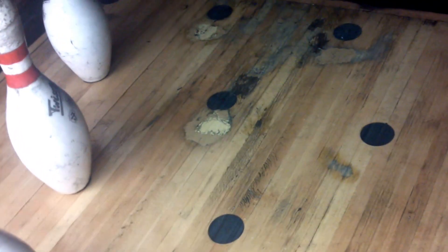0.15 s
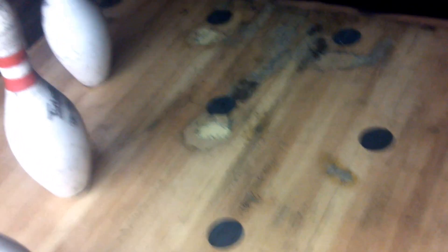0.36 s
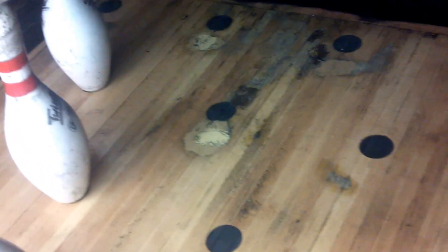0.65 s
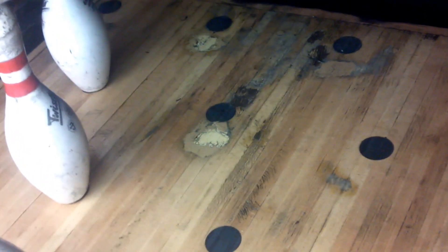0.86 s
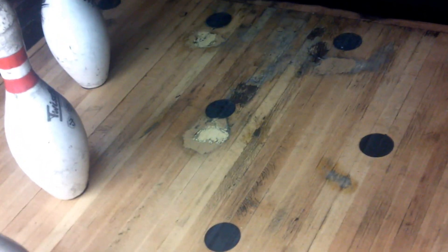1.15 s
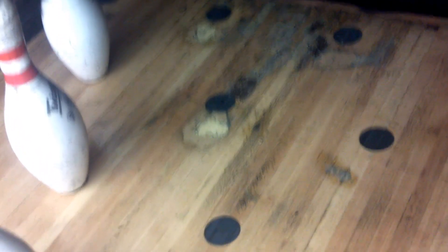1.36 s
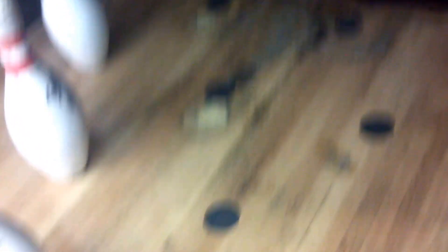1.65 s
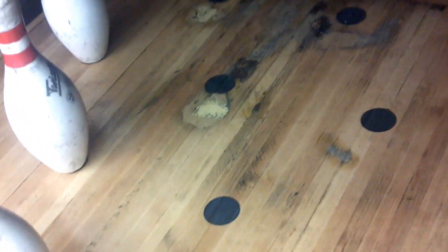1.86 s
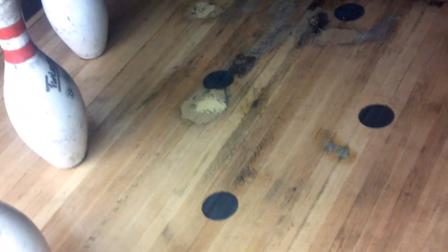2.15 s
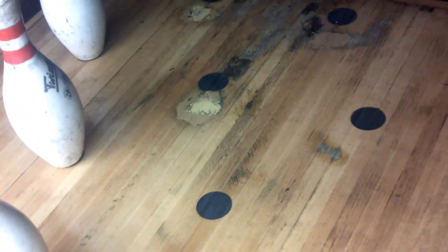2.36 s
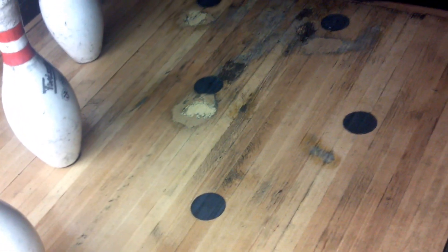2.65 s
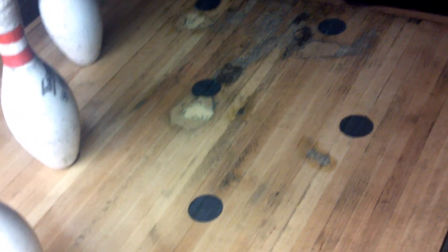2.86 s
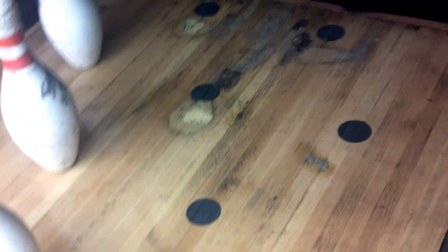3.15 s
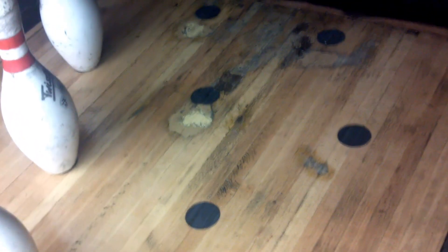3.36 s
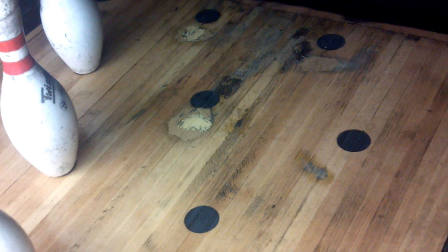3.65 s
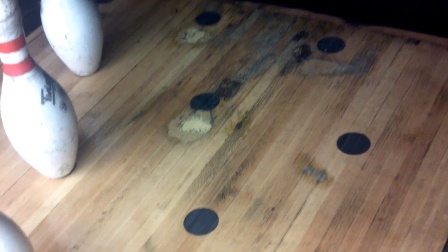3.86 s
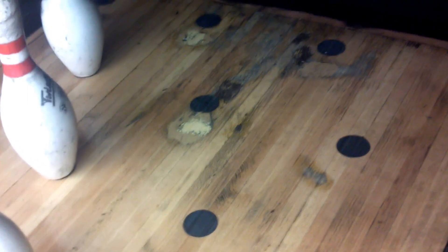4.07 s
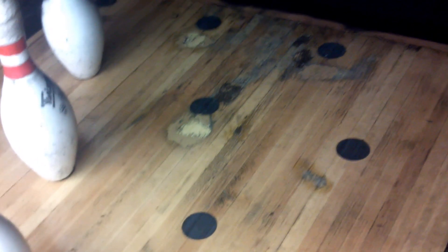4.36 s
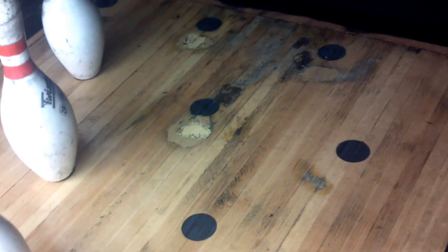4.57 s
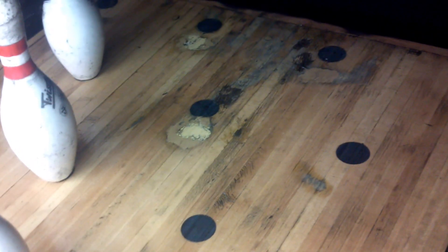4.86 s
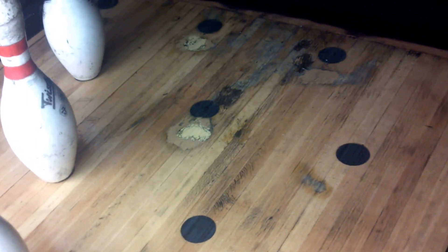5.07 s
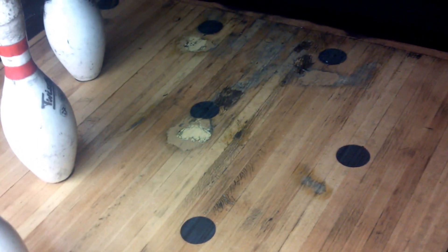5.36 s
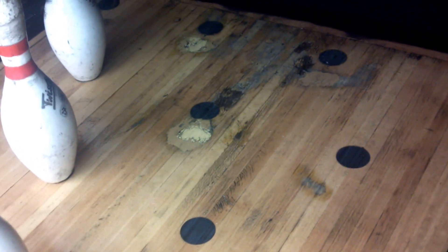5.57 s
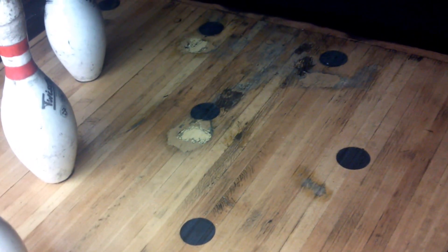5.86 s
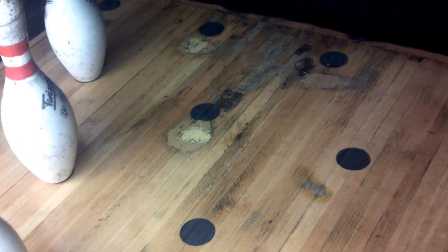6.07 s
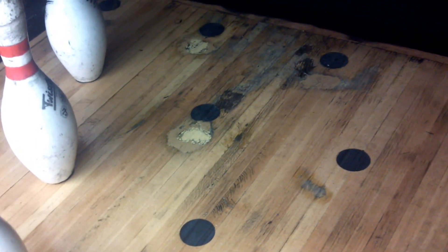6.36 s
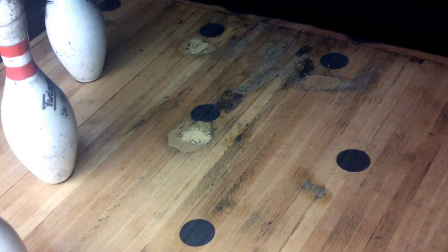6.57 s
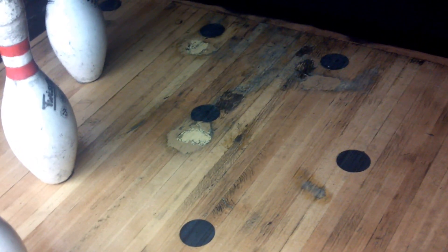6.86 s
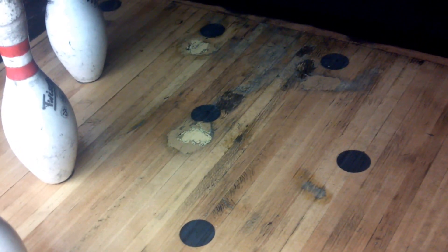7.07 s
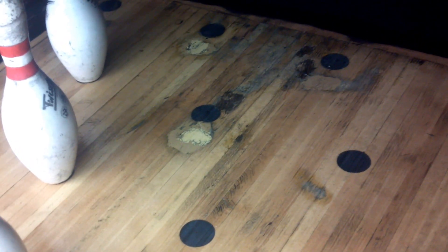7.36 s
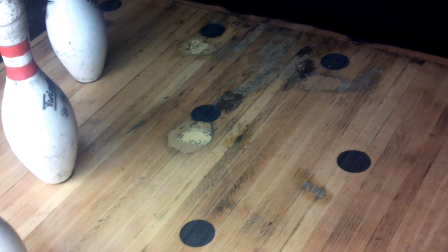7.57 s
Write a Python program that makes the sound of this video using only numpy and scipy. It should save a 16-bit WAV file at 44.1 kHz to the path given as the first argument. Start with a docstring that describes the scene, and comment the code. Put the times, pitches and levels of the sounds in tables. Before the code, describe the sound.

Steady gear whine, motor drone and hiss from a bowling pinsetter, with early steel clacks and a brief squeak, then soft, far-off pin thuds.

```python
"""A pinsetter idles behind the lanes of a bowling alley. From the start its gear mesh whines on one steady
pitch over the roar and hiss of motor, belts and boards. Steel linkages clack lightly and a pivot squeaks;
near one second come the hardest clacks, at which the gain control of a small camera ducks, then creeps
back. Pins thud far off from then to the end, with two more faint clacks. Throughout, the camera aims its
two microphone ports left and right by delay and subtraction."""
import sys
import numpy as np
from scipy import signal
from scipy.fft import rfft, irfft, next_fast_len
from scipy.io import wavfile
from scipy.ndimage import uniform_filter1d, minimum_filter1d, map_coordinates

SR = 44100
rng = np.random.default_rng(int(sys.argv[2]) if len(sys.argv) > 2 else 0)


def master_out(mix):
    """Clip the mix to full scale and print it as 16-bit PCM to the path in sys.argv[1]."""
    frames = np.transpose(np.atleast_2d(mix))
    ceiling = np.clip(frames, -1, 1)
    pcm = np.round(ceiling * 32767).astype(np.int16)
    wavfile.write(sys.argv[1], SR, pcm)


N = 340452
TIME_S = np.arange(N) / SR
SIDE = np.array([[1], [-1]])  # left, right

MESH_HZ = 596.18  # teeth meeting per second
# harmonics of the gear mesh: multiple, left_db, right_db, left_lag_rad
MESH_HARMONICS = [(1, -22.5, -16.6, .8), (2, -40, -47.5, .7), (3, -49, -39, -1.7), (4, -45, -44, -2.1),
                  (5, -46, -38, 1.9), (6, -54, -43.5, 2.8), (7, -53, -55, .8), (8, -60, -52, -.4)]
def gear_whine():
    """Periodic tooth contact gives a harmonic series; higher harmonics waver more in level and phase."""
    mesh_phase = 2 * np.pi * MESH_HZ * TIME_S + 0.03 * wobble(8.1)
    out = np.zeros((2, N))
    for k, left_db, right_db, lag in MESH_HARMONICS:
        phase = k * mesh_phase + 0.1 * (k - 1) * wobble(30) + 2 * np.pi * rng.random()
        waver_db = 0.42 * wobble(4.15) + 2 * np.sqrt(k - 1) * wobble(22)
        out += np.sqrt(2) * amp(waver_db) * amp([[left_db], [right_db]]) * np.sin([phase - lag, phase])
    return out


# impacts of the linkages: start_s, level_db, rise_s, tilt_db_per_octave
CLACKS = [(.105, -22.5, 0.0082, 4), (.256, -18.5, 0.0062, 4), (.437, -19.5, 0.0077, 2),
          (0.9232, -10, 0.0009, -0.5), (0.929, -4, 0.002, -1), (.941, -10, 0.0028, 0),
          (0.9538, -4.5, 0.0008, 0), (1.14, -15.5, 0.019, -6.5), (1.268, -16, 0.0016, -3),
          (1.465, -13, 0.0054, -2), (4.59, -24.5, 0.0044, -7.5), (6.277, -24.5, 0.0023, -8.5)]
# damped modes of the steel: pitch_hz, width_hz, level_db
STEEL_MODES = [(1160, 60, -0.5), (1855, 63, 5), (3620, 50, -24.5), (6200, 86, -6.5), (7400, 50, -3),
               (9600, 180, -2.5), (10650, 470, 4.5)]
def linkage_clacks(crack_db=-2.5, crack_t60_s=0.016):
    """Impact excitation: a crack and a loose rattle, coloured by steel modes; harder hits ring longer."""
    out, t = np.zeros((2, N + SR)), np.arange(SR // 2) / SR
    for start_s, level_db, rise_s, tilt_db in CLACKS:
        def colour(hz):
            tilt = amp(tilt_db * np.log2((hz + 300) / 6000))
            band = 1 / (1 + (hz / 14000) ** 6) / (1 + (700 / (hz + 1)) ** 2)
            return tilt * band * (1 + np.abs(resonances(STEEL_MODES, hz)))
        rattle = filtered(rng.standard_normal((2, len(t))), colour)
        rattle_t60_s = 0.28 * 2 ** (level_db / 44)
        decay = amp(-60 * t / rattle_t60_s) + amp(crack_db - 60 * t / crack_t60_s)
        onset = 1 - np.exp(-t / rise_s)
        out[:, round(start_s * SR):][:, :len(t)] += amp(level_db) * onset * decay * rattle
    return out[:, :N] * amp(2 * wobble(500))  # the rattle is uneven


# blows of distant pins: start_s, level_db, brightness_db_per_octave
THUDS = [(.83, -15, -6), (1.155, -23, 31), (1.511, -11.5, 4), (1.77, -21, 10), (1.9, -13, 2),
         (2.81, -11, 6), (3.58, -10, 4), (3.71, -14.5, 5), (4.111, -22, -2), (4.63, -11.5, 4),
         (5.01, -15.5, 4), (5.24, -20, 12), (5.541, -16.5, 16), (5.919, -17, 9), (6.309, -15, 5),
         (6.445, -13.5, 7.5), (6.829, -17, 11), (6.919, -18.5, 15), (7.119, -17, 14), (7.48, -17, 9),
         (7.649, -17.5, -15)]
# modes of the wooden deck: pitch_hz, level_db, t60_s
DECK_MODES = [(165, 2.5, 0.24), (265, -1, 0.2), (310, -8, 0.086), (384, -13, 0.16)]
def pin_thuds(rise_s=0.01, lean_left_db=3):
    """Modal superposition: soft blows ring the wooden deck, brighter ones favouring its upper modes."""
    out, t = np.zeros((2, N + SR)), np.arange(SR // 2) / SR
    onset = 1 - np.exp(-t / rise_s)
    for start_s, level_db, bright_db in THUDS:
        ring = sum(amp(db + bright_db * np.log2(hz / 200) - 60 * t / t60) * np.sin(2 * np.pi * hz * t)
                   for hz, db, t60 in DECK_MODES)
        out[:, round(start_s * SR):][:, :len(t)] += amp(level_db + SIDE * lean_left_db / 2) * onset * ring
    return out[:, :N]


def pivot_squeak(start_s=0.4, pitch_hz=7980, settle_s=0.005, rise_s=0.0038, hold_s=0.022, t60_s=0.073):
    """Friction-induced vibration: a dry pivot slips, and its tone settles, holds and dies away."""
    t = np.maximum(TIME_S - start_s, 0)
    hz = pitch_hz + 344 * np.exp(-t / settle_s) + 110 * wobble(290)
    phase = 2 * np.pi * np.cumsum(hz) / SR
    fade_db = -60 * np.maximum(t - hold_s, 0) / t60_s
    envelope = amp(-24 + fade_db + 4.5 * wobble(143)) * (1 - np.exp(-t / rise_s))
    return envelope * np.sin([phase, phase + 1.1])


# spectrum of motor and boards: frequency_hz, density_db
ROAR_SPECTRUM = [(30, -63), (50, -60), (75, -56), (115, -49), (165, -45), (190, -44.5), (220, -50.5),
                 (264, -49.5), (310, -51.5), (480, -45.5), (640, -51), (1020, -59.5), (1600, -56.5),
                 (2300, -57)]
# the roar's arrival at the ports: frequency_hz, coherence, left_lag_rad, left_minus_right_db
ROAR_ARRIVAL = [(60, .85, -.1, -4), (115, .8, -.08, -4.6), (165, .97, -.18, -1.2), (264, .96, -.06, -1.6),
                (310, .91, .13, -3.1), (480, .96, .58, -3.2), (640, .8, .82, -4.3), (800, .72, .98, -2.4),
                (1100, .62, 1.25, .8), (1600, .6, 3.4, 0), (2300, .3, 5, -.8), (2600, .6, 6.2, 0)]
def machine_roar():
    """Partial coherence: the low noise of motor and boards is mostly shared, offset in phase by port."""
    freqs, density_db = np.transpose(ROAR_SPECTRUM)
    port_hz, coherence, lag, lean_db = np.transpose(ROAR_ARRIVAL)
    shared, *own = patchy_noise(depth_db=0.76)
    def colour(hz):
        level_db = along(hz, freqs, density_db) + SIDE * along(hz, port_hz, lean_db) / 2
        return amp(level_db) / (1 + (hz / freqs[-1]) ** 8)
    share = lambda hz: along(hz, port_hz, coherence)
    phase_shift = lambda hz: np.exp(-.5j * SIDE * along(hz, port_hz, lag))
    direct = filtered(shared, lambda hz: colour(hz) * np.sqrt(share(hz)) * phase_shift(hz))
    diffuse = filtered(np.array(own), lambda hz: colour(hz) * np.sqrt(1 - share(hz)))
    return direct + diffuse


# resonances of the frame: pitch_hz, width_hz, band_level_db
FRAME_MODES = [(192.6, 6.3, -36.5), (478.2, 15, -32.5), (498, 36, -40), (537, 8.1, -38.5),
               (658.5, 11, -43.5), (710, 31, -55), (781, 4.2, -43), (862, 12, -44), (1238, 22, -46),
               (1316.5, 40, -36), (1364, 18, -45), (1395, 6.3, -50), (1504, 5.8, -61), (1586, 38, -58),
               (1887, 33, -38), (2070, 5.2, -53), (3900, 400, -43.5)]
def frame_hum(left_delay_s=0.00022):
    """Forced resonance: parts of the frame pick narrow bands out of a random vibration."""
    bands = [(hz, width, db - 10 * np.log10(width)) for hz, width, db in FRAME_MODES]
    shared, *own = patchy_noise(depth_db=1.7)
    late = np.pad(shared, (round(left_delay_s * SR), 0))[:N]  # the left port faces away
    drive = 0.81 * np.array([late, shared]) + 0.35 * np.array(own)
    return filtered(drive, lambda hz: resonances(bands, hz)) * amp(-SIDE)


# spectrum of belts and bearings: frequency_hz, density_db
HISS_SPECTRUM = [(2300, -70.5), (2900, -64), (3300, -64.5), (3800, -68), (4600, -72.5), (5300, -75),
                 (6200, -70), (7500, -71), (8300, -66), (9000, -69), (10300, -67.5), (11800, -67.5),
                 (13100, -74.5), (14400, -72), (15400, -77.5)]
# share of the hiss common to both ports: frequency_hz, coherence
HISS_COHERENCE = [(2600, .6), (3000, .55), (3500, .1), (4100, 0), (5300, .2), (6900, 0), (8300, .3),
                  (9700, .02), (11000, .2), (12400, 0)]
def belt_hiss():
    """Diffuse field: treble mostly unrelated at the two ports, lightly modulated by the gear teeth."""
    freqs, density_db = np.transpose(HISS_SPECTRUM)
    colour = lambda hz: amp(along(hz, freqs, density_db)) / (1 + (freqs[0] / (hz + 1)) ** 8)
    share = lambda hz: along(hz, *np.transpose(HISS_COHERENCE))
    shared, *own = patchy_noise(depth_db=0.99)
    direct = filtered(shared, lambda hz: colour(hz) * np.sqrt(share(hz)))
    diffuse = filtered(np.array(own), lambda hz: colour(hz) * np.sqrt(1 - share(hz)))
    tooth_pulse = 1 + 0.049 * np.sin(2 * np.pi * MESH_HZ * TIME_S)
    return (direct + diffuse) * tooth_pulse * amp(0.33 * wobble(2.88) + 0.2 * wobble(7.5))


def shaft_hum(turn_hz=57.5, left_db=-52, right_db=-40):
    """Rotating unbalance: the motor shaft radiates one cycle per turn."""
    strength = np.sqrt(2) * amp(0.84 * wobble(1.6))
    phase = 2 * np.pi * turn_hz * TIME_S + 0.3 * wobble(2)
    return amp([[left_db], [right_db]]) * strength * np.sin(phase)


def amp(db):
    """Decibels as an amplitude ratio."""
    return 10 ** (np.asarray(db) / 20)


def along(hz, points, values):
    """Interpolation on a logarithmic frequency axis."""
    return np.interp(np.log(hz + 1), np.log(points), values)


def filtered(x, response):
    """Linear filtering: the spectrum of x times a complex frequency response."""
    size = next_fast_len(x.shape[-1] + 8192)
    return irfft(rfft(x, size) * response(np.fft.rfftfreq(size, 1 / SR)), size)[..., :x.shape[-1]]


def resonances(modes, hz):
    """Summed response of damped oscillators, each given as pitch_hz, width_hz, level_db."""
    return sum(amp(db) * 1j * hz * width / (pitch ** 2 - hz ** 2 + 1j * hz * width)
               for pitch, width, db in modes)


def wobble(rate):
    """Smooth random modulation, rate knots a second."""
    return map_coordinates(rng.standard_normal(int(N * rate / SR) + 4), [TIME_S * rate])


def patchy_noise(depth_db):
    """Three white noises of unit power per hertz, sharing patches of random gain in time and frequency."""
    spectra = signal.stft(rng.standard_normal((3, N)), nperseg=512)[2]
    patches = uniform_filter1d(rng.standard_normal(spectra.shape[1:]), size=5, axis=0)
    patches = uniform_filter1d(patches, size=9, axis=1)
    noise = signal.istft(spectra * amp(depth_db * patches / patches.std()), nperseg=512)[1][:, :N]
    return noise / noise.std() * np.sqrt(SR / 2)


def scene():
    """Superposition: the steady machine and its brief events add at the two ports."""
    steady = machine_roar() + belt_hiss() + gear_whine() + shaft_hum() + frame_hum()
    return steady + linkage_clacks() + pivot_squeak() + pin_thuds()


def gain_control(x, start_db=-7, limit_db=-7.5, deepest_db=-12, hold_s=0.37, climb_db_per_s=3.5):
    """Automatic gain control: a loud peak ducks the gain, which holds, then climbs back toward unity."""
    def average(values, seconds):
        n = round(seconds * SR)
        return signal.fftconvolve(values, np.ones(n) / n)[:N]
    power = average(np.mean(x ** 2, axis=0), seconds=0.002014)
    excess_db = np.maximum(10 * np.log10(np.abs(power) + 1e-12) - limit_db, 0)
    allowed_db = np.maximum(5 - 6 * excess_db, deepest_db)
    hold = round(hold_s * SR)
    held_db = minimum_filter1d(allowed_db, hold, origin=(hold - 1) // 2, mode="nearest")
    held_db[0] = start_db
    climb_db = climb_db_per_s * TIME_S
    gain_db = climb_db + np.minimum.accumulate(held_db - climb_db)
    gain_db = -0.8 * np.logaddexp(0, -gain_db / 0.8)  # rounded approach to 0 dB
    return x * amp(start_db + average(gain_db - start_db, seconds=0.007))


def record(dry, delay_samples=16, top_hz=15750):
    """Differential beamforming: each side loses a delayed copy of the other port, then is levelled."""
    opposite = np.pad(dry[::-1], ((0, 0), (delay_samples, 0)))[:, :N]
    aimed = (dry - 0.9 * opposite) * amp(-0.75 * SIDE)  # the right side gains a little
    levelled = gain_control(aimed)
    soft_clipped = levelled / (1 + np.abs(levelled) ** 8) ** (1 / 8)
    return filtered(soft_clipped, lambda hz: hz < top_hz)


dry = scene()
out = record(dry)
master_out(out)
```